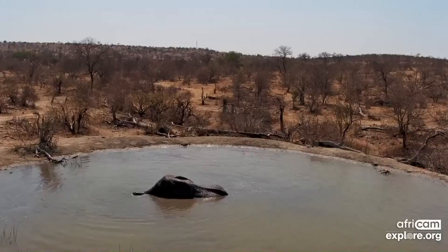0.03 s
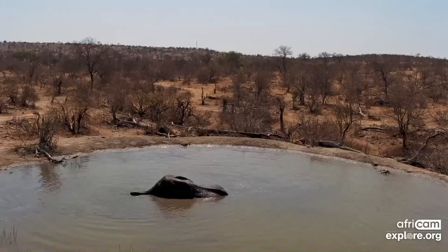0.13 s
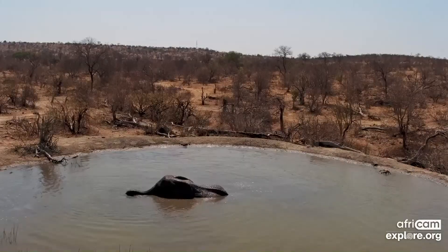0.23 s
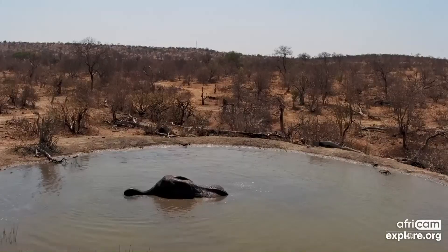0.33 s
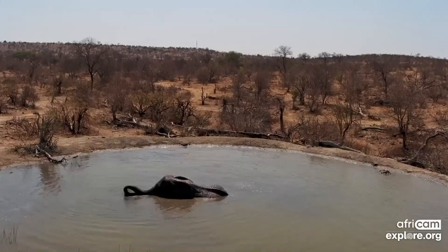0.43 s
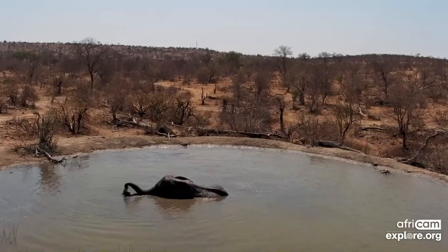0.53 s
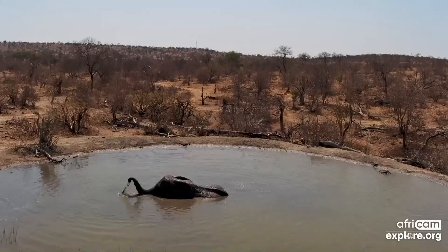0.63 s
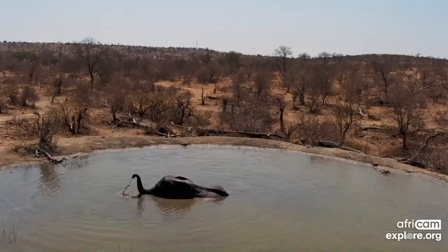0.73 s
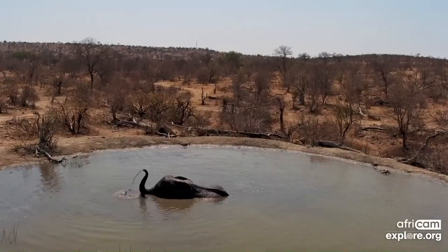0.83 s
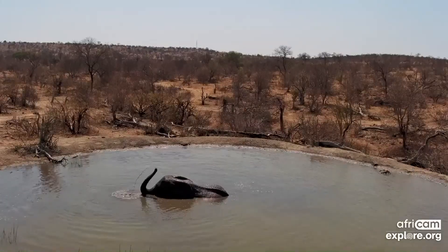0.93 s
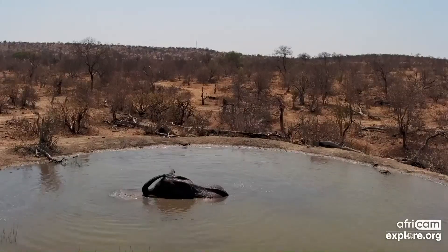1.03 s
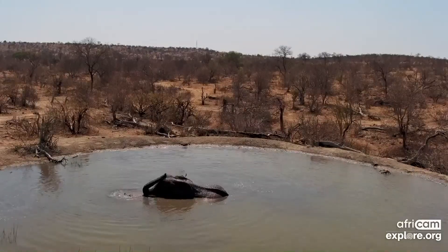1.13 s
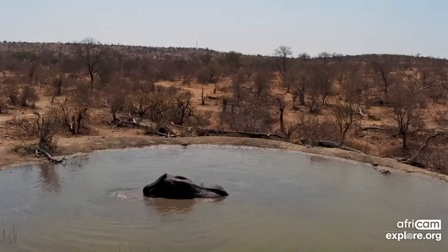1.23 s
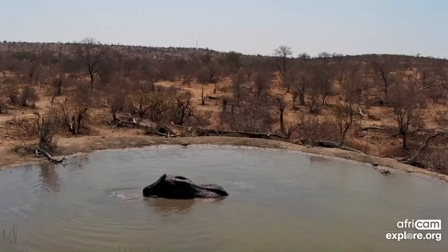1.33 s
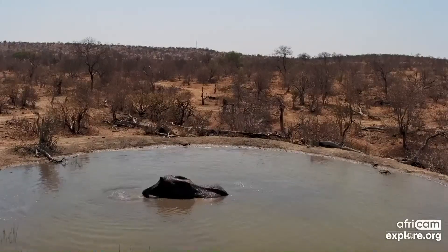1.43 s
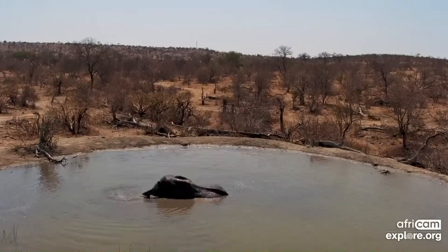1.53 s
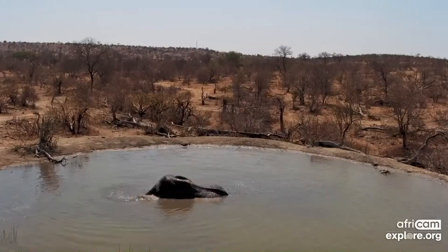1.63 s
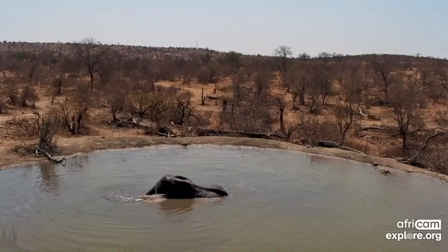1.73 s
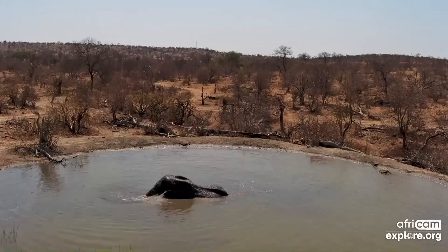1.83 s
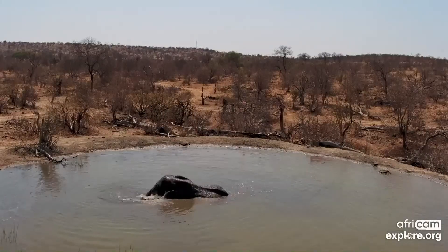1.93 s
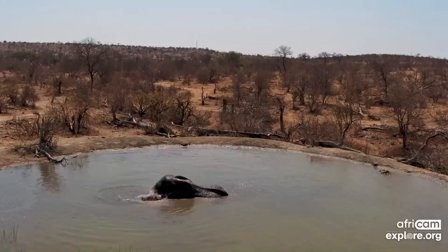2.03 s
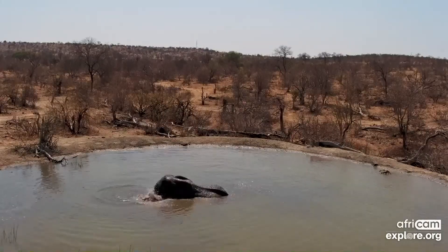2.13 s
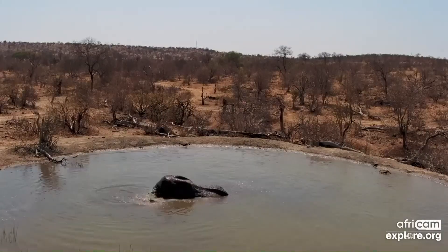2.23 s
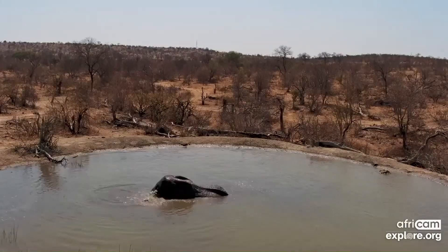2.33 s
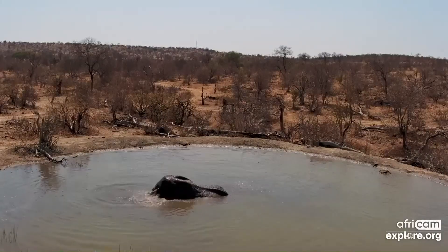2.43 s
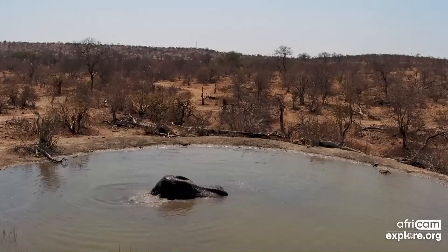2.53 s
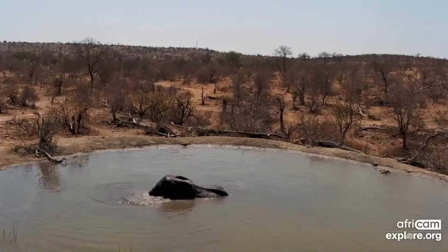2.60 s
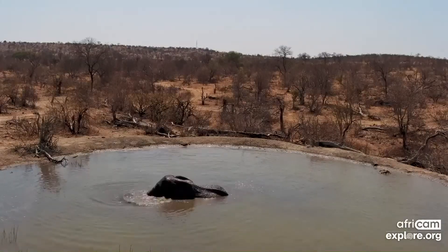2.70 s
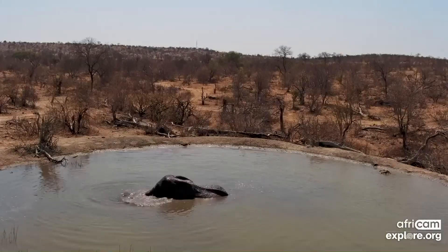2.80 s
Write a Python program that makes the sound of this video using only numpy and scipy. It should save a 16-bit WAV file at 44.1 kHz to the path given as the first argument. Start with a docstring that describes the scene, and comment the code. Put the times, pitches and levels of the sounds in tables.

```python
"""A waterhole, heard from the bank through one distant microphone: an elephant wallows.
Its trunk sheds drops, its head plunges, and the splashing dies away.
Bubbles and drops are ringing tones; spray, slaps and plunges are mostly shaped noise.
The pond mirrors the churning and plunges, the bush answers all the water sounds faintly,
and the microphone hisses over a faint mains buzz."""
import sys
import numpy as np
from scipy import signal
from scipy.fft import rfft, irfft, next_fast_len
from scipy.io import wavfile
from scipy.ndimage import map_coordinates

SR = 44100
rng = np.random.default_rng(int(sys.argv[2]) if len(sys.argv) > 2 else 0)


def wav_out(sig):
    """Save sig, one row per channel (or a flat mono array), as 16-bit PCM at SR to the path in sys.argv[1]."""
    wavfile.write(sys.argv[1], SR, np.round(np.clip(np.atleast_2d(sig).T, -1, 1) * 32767).astype(np.int16))


N = 125685  # length in samples


def amp(db):
    """Turn decibels into a gain."""
    return 10 ** (np.asarray(db) / 20)


def unit(x):
    """Scale a sound to rms 1."""
    return x / np.sqrt(np.mean(x ** 2) + 1e-20)


def filtered(x, response):
    """Multiply the spectrum of x by a function of frequency in Hz."""
    size = next_fast_len(len(x) + 8192)  # spare room, so that echoes do not wrap round
    spectrum = rfft(x, size) * response(np.fft.rfftfreq(size, 1 / SR))
    return irfft(spectrum, size)[:len(x)]


def coloured(x, points):
    """Shape x by a curve of (f/Hz, level/dB) points, then scale it to rms 1."""
    f, db = np.transpose(points)
    return unit(filtered(x, lambda hz: amp(np.interp(np.log(hz + 1), np.log(f), db))))


def wobble(rate):
    """Draw a smooth curve through random points, rate points a second."""
    points = rng.standard_normal(int(N * rate / SR) + 4)
    return map_coordinates(points, [np.arange(N) * rate / SR])


def add(out, s, x):
    """Mix x into out, starting at s seconds."""
    i = max(0, round(s * SR))
    out[i:i + len(x)] += x[:len(out) - i]


def burst(t, attack_s, t60):
    """A quick rise and a steady decay of 60 dB in t60 seconds, with peak 1."""
    envelope = (1 - np.exp(-(t / attack_s) ** 2)) * amp(-60 * t / t60)
    return envelope / envelope.max()


def bubbles(count, centre_hz, octaves, cycles, scatter_db, size):
    """A cloud of bubbles at random moments, each fading 60 dB in so many cycles; rms 1."""
    start = rng.integers(0, N, (count, 1))
    pitch, level = rng.standard_normal((2, count, 1))
    hz = np.minimum(centre_hz * 2 ** (octaves * pitch), SR / 4)
    turns = hz * np.arange(size) / SR  # cycles since the bubble began
    fade = amp(scatter_db * np.minimum(level, 2) - 60 * turns / cycles)
    rings = fade * np.sin(2 * np.pi * turns) * (1 - np.exp(-2 * turns))
    places = start + np.arange(size)
    return unit(np.bincount(places.ravel(), rings.ravel(), N)[:N])


def ring(events, bend):
    """Single bubbles that ring for a set number of cycles while their pitch bends."""
    fade_cycles, attack_cycles = 22.5, 2.17  # cycles to fall 60 dB, and to rise
    out, t = np.zeros(N), np.arange(SR // 10) / SR
    for s, db, hz in events:
        life, attack = fade_cycles / hz, attack_cycles / hz
        # from (1 - bend) times the middle pitch towards (1 + bend) times it
        pitch = hz * (1 + bend * (1 - 2 * np.exp(-3 * t / life)))
        tone = np.sin(2 * np.pi * np.cumsum(pitch) / SR)
        add(out, s - attack / 2, amp(db) * burst(t, attack, life) * tone)
    return out


def churn():
    """Stirred water: drops, fine fizz and gurgling; drops and fizz blur as the drops get louder."""
    # strength of the churning, before the trims below:
    # (t/s, drops level/dB, gurgling level/dB, fizz level/dB)
    churn_strength = [(0.0, -68.5, -91, -73.5), (0.21, -65, -56.5, -69), (0.31, -58.5, -67, -65.5),
                      (0.41, -52.5, -46, -60), (0.47, -47.5, -50.5, -59), (0.53, -50, -43.5, -58.5),
                      (0.63, -49, -51.5, -55), (0.69, -53, -61, -58.5), (0.78, -51, -48.5, -55.5),
                      (0.88, -52, -59.5, -57.5), (1.02, -49, -51.5, -54.5), (1.2, -52.5, -57, -57.5),
                      (1.4, -49, -50, -55.5), (1.57, -41, -50, -51), (1.72, -50, -43, -52),
                      (1.86, -44, -43, -52), (1.99, -52, -46, -55), (2.169, -41, -45.5, -55),
                      (2.25, -49, -61, -54), (2.41, -48, -51, -55), (2.485, -56.5, -51.5, -64.5),
                      (2.53, -52.5, -73, -57.5), (2.62, -57, -62.5, -64), (2.85, -58, -54.5, -65.5)]
    # tone colour of the drops, relative: (f/Hz, level/dB)
    spray_colour = [(50, -55), (160, -22), (320, -12), (450, -2), (700, -2), (820, -2), (1020, 5.5),
                    (1180, 0.5), (1400, 2), (1650, 0), (2100, 5), (2800, 5.5), (3800, -5), (7000, -47)]
    # tone colour of the fizz, relative: (f/Hz, level/dB)
    fizz_colour = [(400, -68), (2000, -21), (2800, -16.5), (3500, -7), (4400, -2.5), (5200, -6),
                   (5900, -11), (7000, -12.5), (12000, -11)]
    spray_db, fizz_db, gurgle_db = 1, 1, -4.5  # trims
    spurt_db, spurts_per_s = 1.14, 30  # random unevenness of the level
    wash_gain, wash_growth = 1, 0.15  # noise at the average drops level; dB more per dB of drops

    s, *columns = np.transpose(churn_strength)
    level, low, high = [np.interp(np.arange(N) / SR, s, column) for column in columns]
    drops = bubbles(count=3000, centre_hz=1480, octaves=0.75, cycles=30.0, scatter_db=3.0, size=700)
    fine = bubbles(count=3000, centre_hz=3942, octaves=0.33, cycles=52, scatter_db=3.0, size=300)
    large = bubbles(count=1400, centre_hz=640.5, octaves=0.31, cycles=9.9, scatter_db=4.5, size=1500)
    wash = wash_gain * amp(wash_growth * (level - level.mean()))

    def merged(x):
        """Bubbles too dense to tell apart sound like noise; keep the power even."""
        return (x + wash * rng.standard_normal(N)) / np.sqrt(1 + wash ** 2)

    layers = [(spray_db + level, coloured(merged(drops), spray_colour)),
              (fizz_db + high, coloured(merged(fine), fizz_colour)),
              (gurgle_db + low, large)]
    surge = wobble(spurts_per_s)  # shared by all layers
    out = np.zeros(N)
    for db, x in layers:
        own = wobble(spurts_per_s)
        out += amp(db + spurt_db * (surge + own)) * x
    return out


def hiss():
    """Still air and microphone hiss: steady noise, strongest in the bass."""
    # tone colour of the background, relative: (f/Hz, level/dB)
    floor_colour = [(20, -43), (70, -48.5), (130, -51.5), (300, -53), (650, -55), (1500, -57.5),
                    (3000, -67.5), (6400, -61.5), (12000, -66.5)]
    floor_db = -62.5
    return amp(floor_db) * coloured(rng.standard_normal(N), floor_colour)


def pond_mirror(x):
    """The pond's surface reflects the sound: one weaker copy follows a moment later."""
    delay_s, gain = 0.001484, 0.23
    return filtered(x, lambda hz: 1 + gain * np.exp(-2j * np.pi * hz * delay_s))


def bush(x):
    """Banks and bushes scatter the sound into a faint, dull tail of fading noise."""
    bush_db, bush_t60_s = -15, 0.27
    t = np.arange(SR // 2) / SR
    dull = filtered(rng.standard_normal(len(t)), lambda hz: 1 / (1 + (hz / 4000) ** 2))
    tail = dull * burst(t, attack_s=0.0013, t60=bush_t60_s)
    return amp(bush_db) * signal.fftconvolve(x, tail / np.linalg.norm(tail))[:N]


def buzz():
    """Faint mains interference: one thin tick per mains cycle."""
    # tone colour of the ticks, relative: (f/Hz, level/dB)
    buzz_colour = [(1500, -24), (6000, -21), (11000, -21.5)]
    mains_hz, start_s, buzz_db = 50, .0118, -68
    ticks = np.zeros(N)
    times = np.arange(start_s, N / SR, 1 / mains_hz)
    ticks[(times * SR).astype(int)] = 1
    return amp(buzz_db) * coloured(ticks, buzz_colour)


def gulps():
    """Large air pockets ring in the water, and their pitch sags as they fade."""
    # single large air pockets: (t/s, level/dB before the trim, middle pitch f/Hz)
    air_pockets = [(0.014, -40, 713), (0.212, -40, 623), (0.284, -40.5, 670), (0.333, -43, 650),
                   (0.366, -40.5, 553), (0.396, -36, 760), (0.588, -38, 730), (0.6, -33, 654),
                   (0.725, -40, 574), (0.924, -33.5, 1380), (0.953, -35.5, 766), (1.006, -31, 1460),
                   (1.008, -44, 620), (1.679, -29.5, 700), (1.823, -34, 612), (1.838, -24.5, 1073),
                   (1.899, -26.5, 632), (1.913, -35, 670), (1.934, -35.5, 710), (1.951, -30, 551),
                   (1.988, -34, 620), (1.999, -41, 573), (2.081, -34.5, 507), (2.105, -36.5, 695),
                   (2.129, -41, 486), (2.508, -35.5, 1394), (2.522, -43, 736), (2.549, -40, 720),
                   (2.677, -44, 1440)]
    gulp_db, sag = -2.5, 0.044  # trim; share of the middle pitch
    return amp(gulp_db) * ring(air_pockets, -sag)


def drips():
    """Small drops fall from the trunk; each one's bubble rises in pitch as it fades."""
    # single falling drops: (t/s, level/dB, middle pitch f/Hz)
    falling_drops = [(.139, -49, 2600), (.199, -45, 2630), (.222, -46.5, 2620), (.330, -43.5, 4400),
                     (.754, -36, 4330), (.772, -37, 2720), (.840, -38.5, 2240), (.857, -35.5, 2720),
                     (.898, -35, 4400), (1.174, -36.5, 4000), (1.286, -39.5, 2060), (2.153, -29.5, 2060),
                     (2.4122, -29.5, 2680)]
    return ring(falling_drops, bend=0.12)


def gloops():
    """Cavities open or close: the pitch sweeps while a wavering tone swells and fades."""
    # sweeping cavities: (t/s, length/s, level/dB before wavering, first f/Hz, last f/Hz)
    cavities = [(0.419, .028, -42.5, 539, 1110), (0.842, 0.083, -61, 477, 970),
                (1.855, 0.0266, -43, 1004, 668)]
    waver_db, wavers_per_s = 2, 162
    out = np.zeros(N)
    for s, length, db, first_hz, last_hz in cavities:
        u = np.linspace(0, 1, int(length * SR))  # 0 at the start, 1 at the end
        pitch = first_hz * (last_hz / first_hz) ** u
        tone = np.sin(2 * np.pi * np.cumsum(pitch) / SR)
        swell = np.sqrt(4 * u * (1 - u))
        waver = waver_db * wobble(wavers_per_s)[:len(u)]
        add(out, s, amp(db + waver) * swell * tone)
    return out


def plunges():
    """Head and trunk hit the water: broad noise that starts sharply and dies fast."""
    # heavy plunges: (t/s, level/dB of the noise before its rise and decay)
    body_hits = [(0.454, -53), (0.901, -47.5), (1.008, -52), (1.555, -43.5), (1.838, -33.5), (2.117, -44),
                 (2.147, -42)]
    # tone colour of a plunge, relative: (f/Hz, level/dB)
    plunge_colour = [(60, -41), (170, -2), (350, 4.5), (650, 8), (1100, 5), (2000, -1), (4500, 2),
                     (7000, -19), (12000, -27)]
    attack_s, t60_s = .0015, 0.072
    out, t = np.zeros(N), np.arange(SR // 4) / SR
    for s, db in body_hits:
        noise = coloured(rng.standard_normal(len(t)), plunge_colour)
        add(out, s - attack_s / 2, amp(db) * burst(t, attack_s, t60_s) * noise)
    return out


def slaps():
    """Falling lumps of water smack the surface: short noise, each with its own brightness."""
    # slaps on the surface: (t/s, peak level/dB before the trim, centre f/Hz)
    smacks = [(0.896, -25.5, 3300), (.952, -27, 2800), (0.9828, -22, 4100), (1.240, -27.5, 3600),
              (1.285, -28, 3700), (1.296, -29.5, 4200), (1.361, -20.5, 2120), (1.414, -26, 2380),
              (1.837, -17, 1500), (1.858, -27, 1970), (2.038, -23, 1550), (2.152, -22, 1910),
              (2.3168, -26, 2200), (2.363, -29.5, 1200), (2.4122, -29.5, 2960)]
    slap_db, t60_s, octaves = -8, 0.018, .5  # trim, decay, spread of the band round its centre
    out, t = np.zeros(N), np.arange(SR // 20) / SR
    for s, db, centre in smacks:
        def band(hz):
            """A hump round the centre, cut steeply above 5400 Hz."""
            hump = np.exp(-.5 * (np.log2((hz + 1) / centre) / octaves) ** 2)
            return hump / (1 + (hz / 5400) ** 12)

        noise = unit(filtered(rng.standard_normal(len(t)), band))
        smack = noise * burst(t, attack_s=0.00076, t60=t60_s)
        add(out, s, amp(db + slap_db) * smack / np.abs(smack).max())
    return out


def scene():
    """Mix the water, its reflections, buzz and hiss; both channels are the same."""
    splash = pond_mirror(churn() + plunges())
    water = splash + gulps() + drips() + gloops() + slaps()
    mono = water + bush(water) + buzz() + hiss()
    return np.array([mono, mono])


def record(dry):
    """Nothing passes at or above the band limit of 12200 Hz."""
    top_hz = 12200
    return np.array([filtered(x, lambda hz: hz < top_hz) for x in dry])


dry = scene()
out = record(dry)
wav_out(out)
```